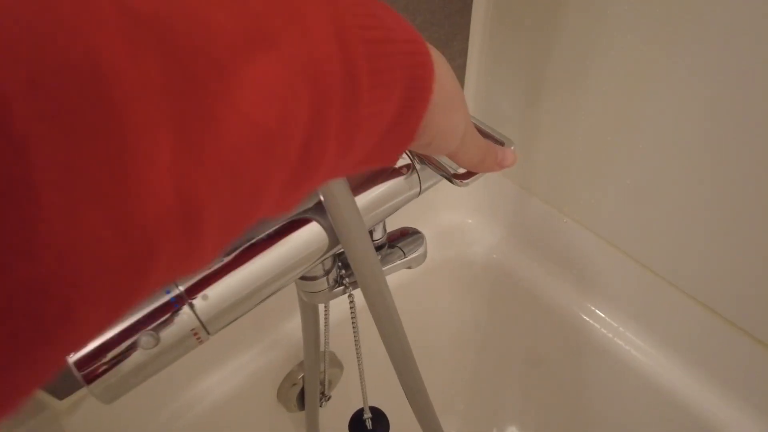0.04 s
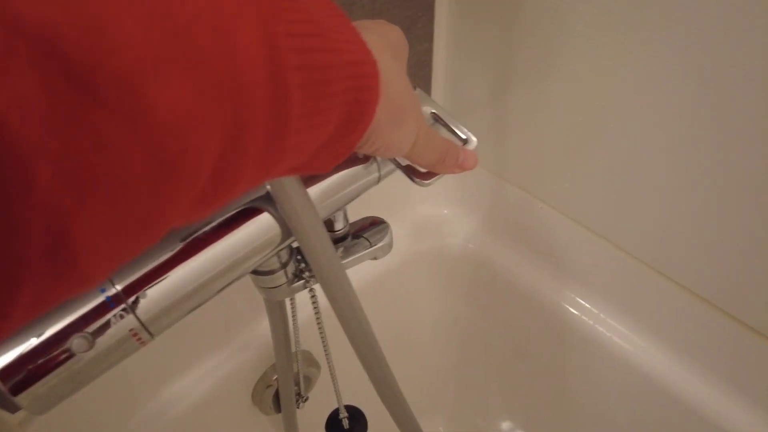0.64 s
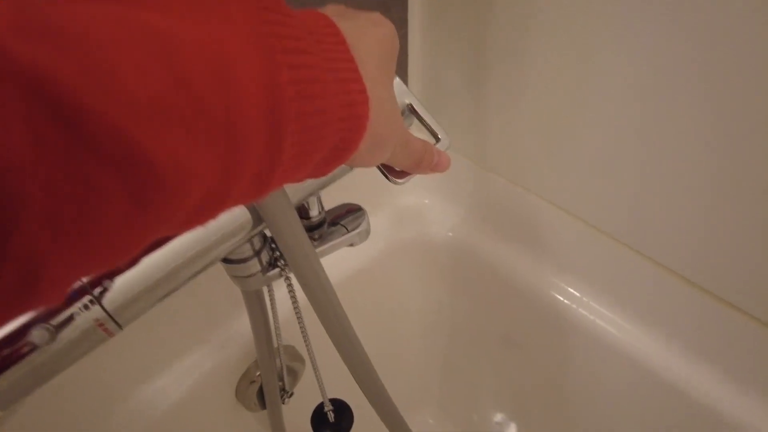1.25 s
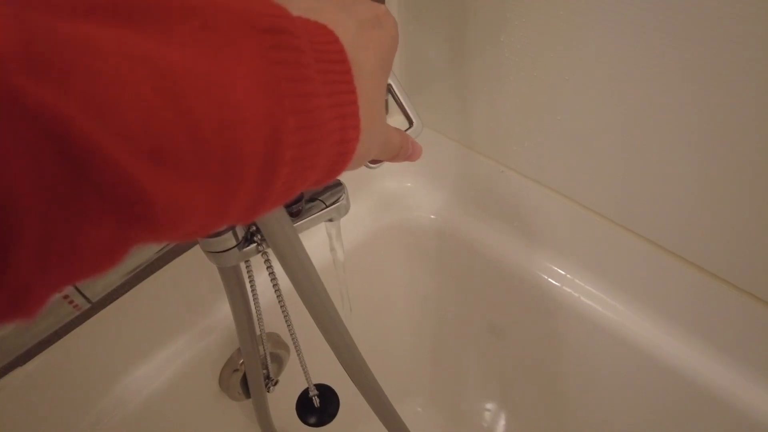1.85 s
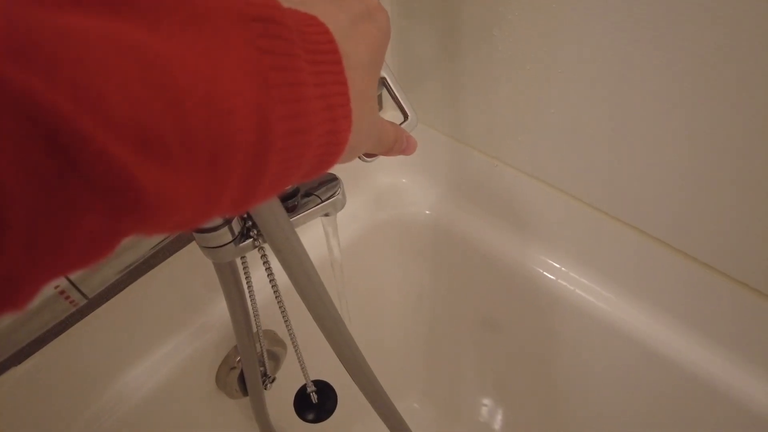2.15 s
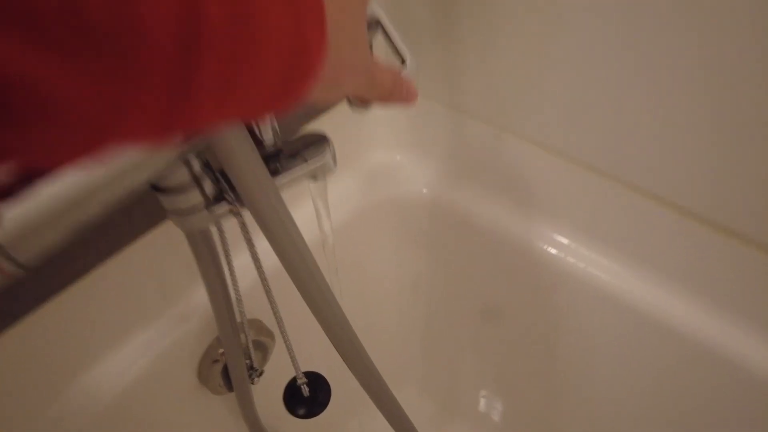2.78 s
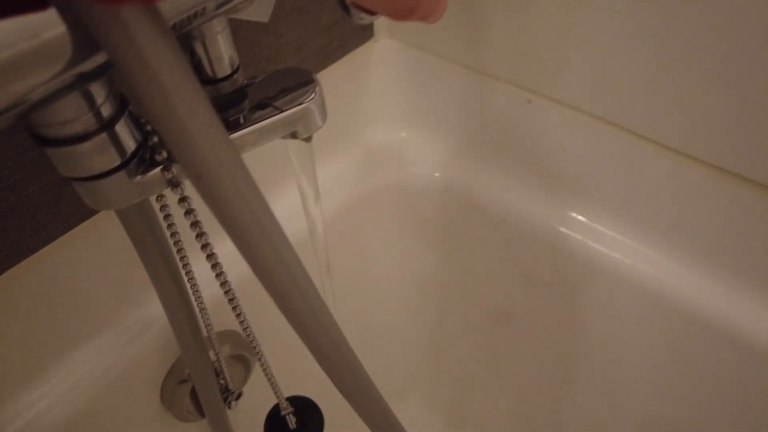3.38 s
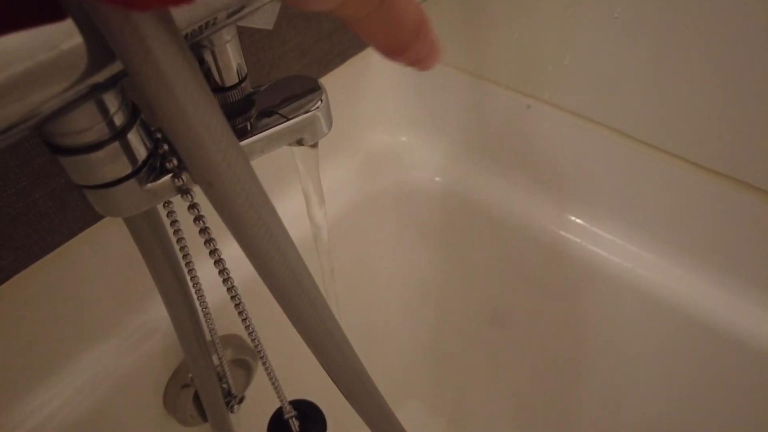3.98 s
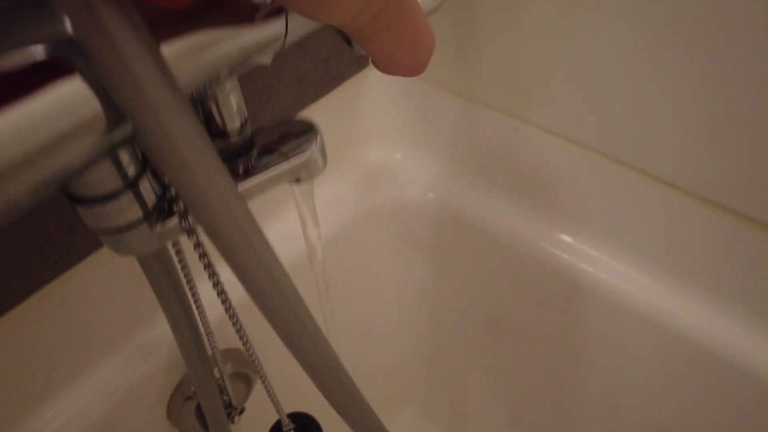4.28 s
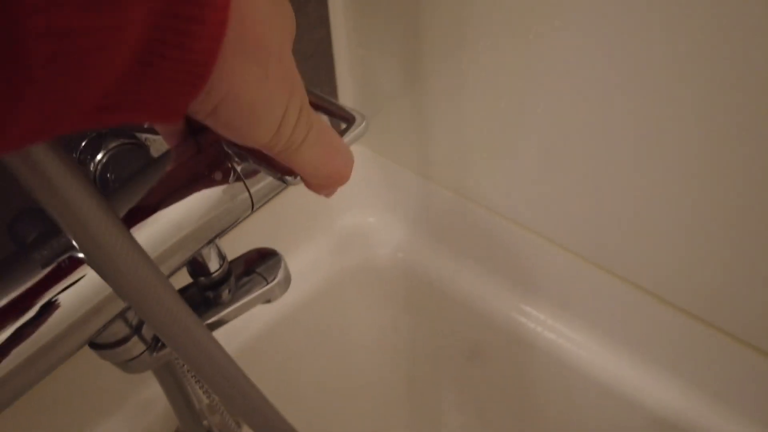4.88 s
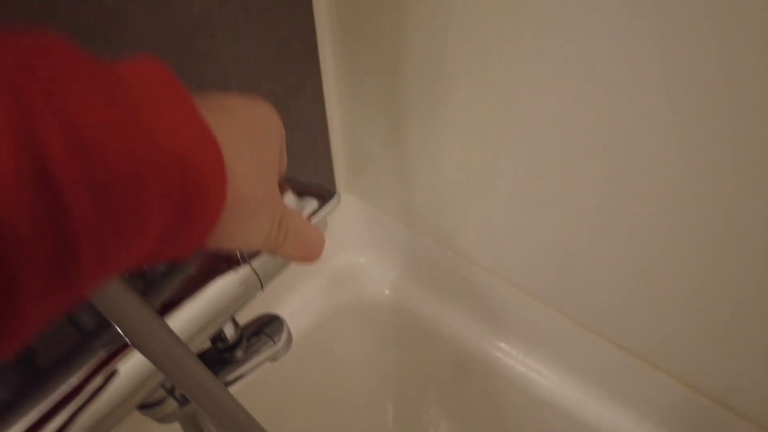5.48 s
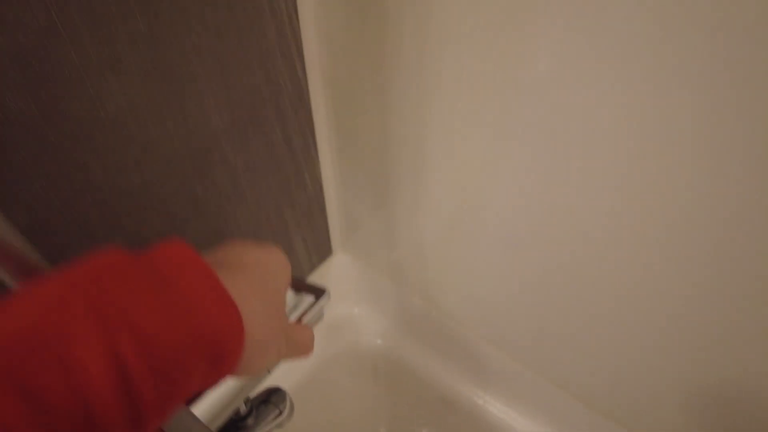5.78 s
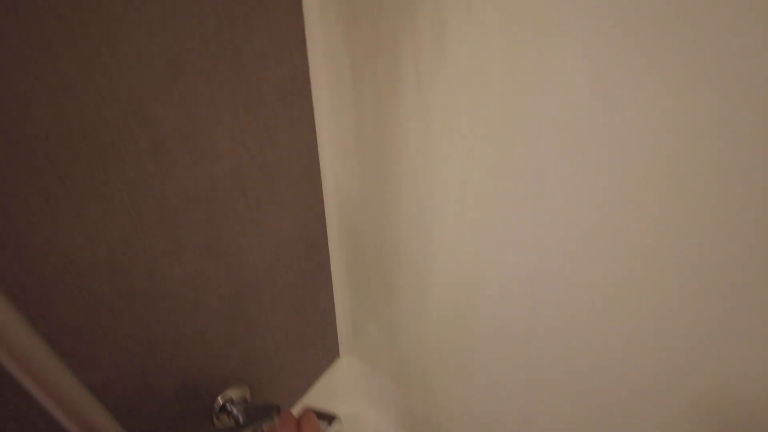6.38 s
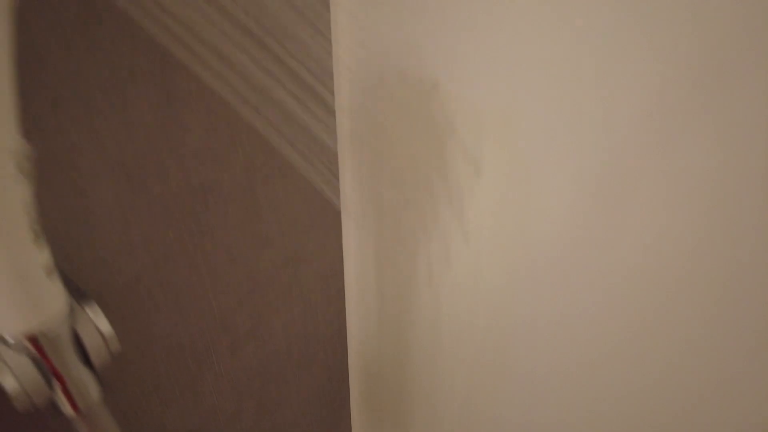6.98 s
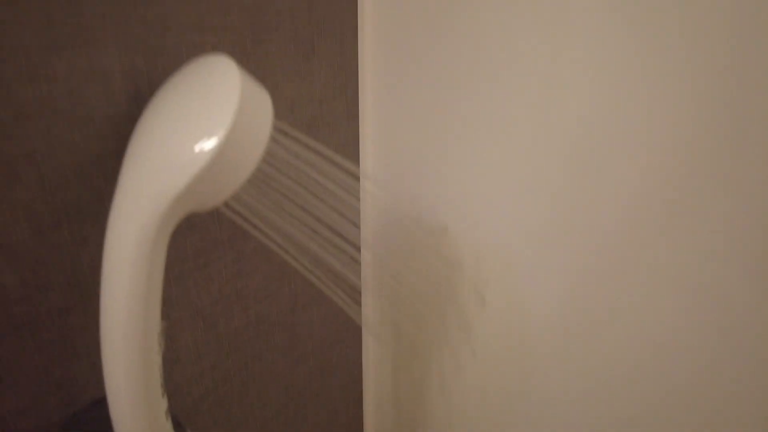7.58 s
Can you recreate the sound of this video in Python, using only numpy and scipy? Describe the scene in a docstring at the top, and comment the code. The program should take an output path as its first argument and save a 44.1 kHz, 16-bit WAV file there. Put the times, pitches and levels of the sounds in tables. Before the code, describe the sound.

A bath tap clicks on, water splashes and trickles into the tub, then it clicks over to a spraying shower while a fan hums.

```python
"""An extractor fan hums in a small plastic-walled bathroom. A bath mixer's lever clicks, ringing its
metal body; the valve hisses, the first water slaps the tub, and a thin stream drums and drips on it.
The lever rubs and clicks shut, then clicks over to the shower. Air rushes down the shuddering hose and
gurgles out of the hollow head; then fine jets sizzle on the wall panel and make it drum."""
import sys
import numpy as np
from scipy import signal
from scipy.fft import rfft, irfft
from scipy.io import wavfile

SR = 44100
rng = np.random.default_rng(int(sys.argv[2]) if len(sys.argv) > 2 else 0)


def digitize_waveform(pressure):
    """Quantize a signal to 16-bit integers and store it at the path in sys.argv[1].

    Rows of a 2-D input are taken as channels; values are limited to [-1, 1].
    """
    field = np.atleast_2d(pressure).T
    bounded = np.clip(field, -1, 1)
    quanta = np.round(bounded * 32767).astype(np.int16)
    wavfile.write(sys.argv[1], SR, quanta)


N = 341334
TIME = np.arange(N) / SR
SPOUT_ON_S, SPOUT_OFF_S, SHOWER_FULL_S = 1.8, 4.44, 6.2

# tub resonances: f/Hz, width/Hz, gain/dB
TUB_MODES = [(98, 10.5, -0.5), (130, 17, -6), (161.2, 8.8, -2.5), (213.7, 12, -1.5), (232, 41, -11.5),
             (267.7, 7.33, -7), (304.4, 15, -14.5), (484, 17, -17), (641.5, 22, -19.5), (760, 27, -24)]
# empty shower head's resonances: f/Hz, width/Hz, gain/dB
HEAD_MODES = [(770, 250, -6.5), (1377, 195, -.5), (1660, 210, -1), (3240, 1000, -9)]


def from_db(db):
    """Decibels to gain."""
    return 10 ** (np.asarray(db) / 20)


def unit_rms(x):
    """Scale to rms 1."""
    return x / np.sqrt(np.mean(x ** 2) + 1e-20)


def unit_hit(x):
    """Scale to the energy of 4 ms at rms 1."""
    return x * np.sqrt(.004 * SR / np.sum(x ** 2))


def add(track, t_s, sound):
    """Mix a sound into a track at t_s."""
    at = round(t_s * SR)
    track[at:at + len(sound)] += sound[:N - at]


def drift(rate_hz):
    """Slow random wander between knots of spread 1."""
    knots = rng.standard_normal(4000)
    return np.interp(TIME * rate_hz, np.arange(len(knots)), knots)


def swell(start_s, end_s, db, rise_s, fall_s):
    """Gain held from start to end; flanks of 20 dB per rise or fall time."""
    early_s, late_s = np.maximum(start_s - TIME, 0), np.maximum(TIME - end_s, 0)
    return from_db(db - 20 * (early_s / rise_s + late_s / fall_s))


def power_sum(gains):
    """Unrelated swells add in power."""
    return np.sqrt(np.sum(np.square(gains), axis=0))


def colour(x, spectrum):
    """Minimum-phase filter through (f/Hz, gain/dB) points."""
    size = 8192
    half = size // 2
    hz, db = np.transpose(spectrum)
    grid_hz = np.maximum(np.arange(half + 1) * SR / size, 1)
    gain = from_db(np.interp(np.log(grid_hz), np.log(hz), db))
    cepstrum = irfft(np.log(gain))
    cepstrum[1:half] *= 2
    response = irfft(np.exp(rfft(cepstrum[:half], size)))[:half]
    return signal.oaconvolve(x, np.array(response, ndmin=x.ndim), axes=-1)[..., :x.shape[-1]]


def resonate(x, modes):
    """Parallel resonances of alternating sign."""
    out = 0
    for k, (hz, width_hz, db) in enumerate(modes):
        radius = np.exp(-np.pi * width_hz / SR)
        poles = [1, -2 * radius * np.cos(2 * np.pi * hz / SR), radius * radius]
        gain = (-1) ** k * from_db(db) * (1 - radius * radius) / 2
        out = out + gain * signal.lfilter([1, 0, -1], poles, x + 1e-18)
    return out


def cavity(x, modes):
    """Sound passes twice, in and out, so the skirts are steep."""
    return resonate(resonate(x, modes), modes)


def diffuse(pair):
    """Two unrelated signals to a stereo field, alike in the bass only; mid rms 1."""
    # stereo width: f/Hz, side gain/dB
    side_spectrum = [(60, -21.5), (110, -22), (200, -15), (380, -7), (700, 0.5), (1290, -2.5), (2380, -3),
                     (4400, 2), (15000, -0.5)]
    mid, side = unit_rms(pair[0]), colour(unit_rms(pair[1]), side_spectrum)
    return np.array([mid + side, mid - side])


def noise_pair():
    """Two unrelated white noises."""
    return rng.standard_normal((2, N))


def impacts(per_s, spread_db):
    """Two random impulse trains, most impulses small, a few large."""
    sizes = from_db(spread_db * np.minimum(rng.exponential(1, (2, N)), 4))
    signs = rng.choice([-1, 1], (2, N))
    return sizes * signs * (rng.random((2, N)) < per_s / SR)


def burst(length_s):
    """Decaying, pitchless cluster of tiny impacts."""
    t = TIME[:SR // 8]
    envelope = np.exp(-t / max(length_s, 1e-4))
    cluster = rng.standard_normal(len(t)) * envelope
    for _ in range(3):
        whitened = irfft(np.exp(1j * np.angle(rfft(cluster))), len(t))
        cluster = whitened * np.minimum(1, 10 * envelope)
    return cluster


def fan(air_db=-55.5, boom_db=-55, waver_db=0.4):
    """Air noise, the room resonances it stirs and the motor's tones."""
    # air noise: f/Hz, gain/dB
    air_spectrum = [(12, -25.5), (20, -4), (44, -1.5), (68, -9), (86, -23.5), (107, -13.5), (130, -37.5),
                    (204, -22), (234, -26), (388, -38.5), (558, -49), (607, -29.5), (1000, -33),
                    (2460, -43.5), (16000, -64)]
    # room resonances: f/Hz, width/Hz, gain/dB
    room_modes = [(99.8, 10.8, 6.5), (175, 12, 4), (205, 19, 3.5), (379.4, 47, -8), (469, 14, -8),
                  (523, 68, -13), (672, 24, -12.5), (1310, 96, -21)]
    # shaft and mains tones: f/Hz, level/dB
    motor_tones = [(14.6, -55.5), (33.9, -46), (100, -57.5), (200.1, -61), (300.2, -74.5)]
    air = from_db(air_db) * diffuse(colour(noise_pair(), air_spectrum))
    boom = from_db(boom_db) * diffuse(resonate(noise_pair(), room_modes))
    hum = np.zeros(N)
    for hz, db in motor_tones:
        amplitude = np.sqrt(2) * from_db(db + waver_db * drift(rate_hz=3.2))
        hum += amplitude * np.sin(2 * np.pi * (hz * TIME + rng.random()))
    return air + boom + hum * from_db([[-1.4], [1.3]])


def lever(ring_db=-1.5, stress_db=6, body_db=-17, thud_hz=57, thud_t60_s=0.37):
    """Each detent scrapes to its notch, snaps, rings the metal body and shakes the wall."""
    # detents: t/s, level/dB, contact/s, f struck hardest/Hz, knock/dB, wall thud/dB, scrape/dB
    detents = [(0.7228, -33.5, 0.0015, 5600, 7, -44, -62), (4.8164, -27.5, .0014, 2560, -9, -37, -54),
               (4.818, -28, 0.001, 6520, -9, -59.5, -56.5), (5.462, -35, 0.0027, 7500, 4, -52, -50)]
    # mixer's metal body: f/Hz, width/Hz, gain/dB
    metal_modes = [(1270, 220, -9), (1850, 260, -6), (2560, 520, -0.5), (3720, 140, -2), (4650, 300, -7),
                   (5300, 450, -6), (6040, 200, -3), (6520, 380, 0), (7400, 470, -6), (8480, 600, -3),
                   (9550, 600, -6), (10950, 600, -7), (12700, 910, -10.5), (15260, 540, -7)]
    # snap and scrape: f/Hz, gain/dB
    contact_spectrum = [(200, -14), (900, -11), (1600, -14), (2600, 0), (4500, 1), (6500, -1.5),
                        (10000, -5.5), (15000, -3.5)]
    knock_modes = [(750, 900, -5), (1280, 380, 0), (1900, 480, 0)]
    clicks, thuds = np.zeros(N), np.zeros(N)
    friction = unit_rms(colour(impacts(per_s=4000, spread_db=4.0)[0], contact_spectrum))
    t = TIME[:3 * SR]
    sway = (1 - np.exp(-t / 0.056)) ** 2 * from_db(-60 * t / thud_t60_s)
    thud = np.sin(2 * np.pi * thud_hz * t) * sway / sway.max()
    for t_s, db, contact_s, struck_hz, knock_db, thud_db, scrape_db in detents:
        modes = [(hz, width_hz, mode_db + stress_db * (abs(np.log(hz / struck_hz)) < .08))
                 for hz, width_hz, mode_db in metal_modes]
        ring = from_db(ring_db) * unit_hit(resonate(burst(contact_s), modes))
        knock = from_db(body_db + knock_db) * unit_hit(resonate(burst(0.0081), knock_modes))
        snap = unit_hit(colour(burst(contact_s), contact_spectrum))
        add(clicks, t_s, from_db(db) * (snap + ring + knock))
        clicks += swell(t_s, t_s, scrape_db, rise_s=.012, fall_s=contact_s) * friction
        add(thuds, t_s, from_db(thud_db) * thud)
    return clicks, thuds


def valve(steady_flow, open_db=-72, hiss_db=-2, whistle_db=-7):
    """The gap hisses and whistles, most while held part open."""
    # part-open spells: start/s, end/s, level/dB, rise/s, fall/s
    part_open = [(1.442, 1.8, -59.5, 0.034, .05), (1.832, 1.87, -46, .08, 0.21),
                 (2.296, 2.348, -59, .08, 0.24), (4.333, 4.409, -53.5, 0.29, 0.039)]
    # hiss: f/Hz, gain/dB
    hiss_spectrum = [(700, -29.5), (1300, 0), (2300, 0), (3700, -6.5), (4600, 3.5), (5400, -2.5), (8000, 1),
                     (11500, -3), (12600, 4.5), (16000, 2.5)]
    # gap whistle: f/Hz, width/Hz, gain/dB
    gap_modes = [(2900, 520, -1.5), (9330, 400, -6.5), (10600, 600, -7.5), (14550, 500, -9)]
    envelope = power_sum([from_db(open_db) * steady_flow] + [swell(*spell) for spell in part_open])
    hiss = from_db(hiss_db) * diffuse(colour(noise_pair(), hiss_spectrum))
    whistle = from_db(whistle_db) * diffuse(resonate(noise_pair(), gap_modes))
    return envelope * (hiss + whistle)


def droplets(per_s, spread_db, low_hz, high_hz, q, bands=12):
    """Flying drops land at random, each ticking in the band its size sets."""
    landings = impacts(per_s, spread_db)[0]
    band = rng.integers(0, bands, N)
    centres_hz = np.geomspace(low_hz, high_hz, bands)
    ticks = sum(resonate(landings * (band == k), [(hz, hz / q, 0)]) for k, hz in enumerate(centres_hz))
    return unit_rms(ticks)


def spout(drum_db=-49.5, splash_db=-73.5, spatter_db=-80, splash_exponent=1.63):
    """The stream from the valve breaks into drops that drum on the tub, splash and spatter."""
    # gushes at onset and collapse: start/s, end/s, level/dB re steady flow, rise/s, fall/s
    gushes = [(1.815, 2.278, 3.5, 0.1, 0.26), (4.684, 4.86, 3, .08, 0.16)]
    # splash: f/Hz, gain/dB
    splash_spectrum = [(300, -2), (650, 7.5), (900, 5.5), (1300, 21), (2500, 13.5), (4500, 8.5),
                       (8000, -33.5), (15000, -15)]
    steady_flow = swell(SPOUT_ON_S, SPOUT_OFF_S, db=0, rise_s=0.097, fall_s=.4)
    flow = power_sum([steady_flow] + [swell(*gush) for gush in gushes])
    hiss = valve(steady_flow)
    drum = from_db(drum_db) * diffuse(resonate(impacts(per_s=300, spread_db=2.0), TUB_MODES))
    splash = from_db(splash_db) * unit_rms(colour(impacts(per_s=260, spread_db=0.5)[0], splash_spectrum))
    spatter = from_db(spatter_db) * droplets(per_s=170, spread_db=4.3, low_hz=4500, high_hz=14500, q=5)
    return flow ** splash_exponent * (splash + spatter), hiss + flow * drum


def bubble(hz, cycles=25, rise=0.031):
    """An air pocket rings down 60 dB over the given cycles, its pitch rising as it surfaces."""
    age = TIME[:SR // 8] * hz / cycles
    phase = 2 * np.pi * np.cumsum(hz * (1 + rise * np.minimum(age, 1))) / SR
    return unit_hit(np.sin(phase) * from_db(-60 * age))


def drips(gain_db=-8, small_per_s=22, low_hz=2960, high_hz=9970, rebound_db=-10, rebound_s=.025):
    """Each drop: impact tick, bubble plink, two rebounds. Small drops fall between the big ones."""
    # big drops from spout, then shower head: t/s, relative level/dB, bubble f/Hz, tick/dB re bubble
    big_drops = [(2.4652, -54, 10600, -2), (2.5154, -62, 4040, 0), (2.5916, -43.5, 4450, -8),
                 (2.6696, -52.5, 6050, -7), (2.7311, -57, 4860, -2), (2.778, -51.5, 5230, -6),
                 (2.8418, -57, 5700, -5), (2.8858, -50, 8900, -4), (2.9879, -45, 3520, -8),
                 (2.998, -59, 11500, -1), (3.0489, -56, 9130, -6), (3.0833, -59, 4680, 2),
                 (3.138, -55, 10000, -1), (3.196, -57.5, 3200, 1), (3.283, -49, 14600, 0),
                 (3.318, -60, 10500, -5), (3.423, -50, 2830, -10), (3.438, -56, 8300, -4),
                 (3.5115, -51, 2850, -8), (3.5861, -57, 4100, 2), (3.9553, -59, 9400, -3),
                 (3.975, -39.5, 2620, -20), (4.0997, -50, 2330, -5), (4.1332, -43.5, 8670, -8),
                 (4.2067, -42.5, 6080, -8), (4.2793, -54, 3090, -5), (4.358, -45.5, 6150, -8),
                 (4.3948, -44, 13400, -10), (4.4845, -58, 4170, 0), (5.577, -52, 7000, 0),
                 (5.594, -48, 4200, -4), (5.606, -49, 9000, 2), (5.635, -48, 10000, 3),
                 (5.706, -46, 14000, -7), (5.862, -51, 7400, -5), (5.875, -48, 6700, -7),
                 (5.975, -46, 9000, 0)]
    # impact tick: f/Hz, gain/dB
    tick_spectrum = [(500, -13.5), (2000, -4), (5000, -4.5), (9000, -0.5), (15000, 0.5)]
    small_drops = []
    for k, (jitter, size, pitch) in enumerate(rng.random((150, 3))):
        t_s = SPOUT_ON_S + (k + jitter) / small_per_s
        if t_s < SPOUT_OFF_S:
            small_drops.append((t_s, -63 + 4.5 * (2 * size - 1), low_hz * (high_hz / low_hz) ** pitch, -2))
    out = np.zeros(N)
    tick = unit_hit(colour(burst(0.00055), tick_spectrum))
    for t_s, db, hz, tick_db in big_drops + small_drops:
        add(out, t_s, from_db(db) * (from_db(tick_db) * tick + bubble(hz)))
        for flight_s in rebound_s * rng.random(2):
            add(out, t_s + flight_s, from_db(db + tick_db + rebound_db) * tick)
    return from_db(gain_db) * out


def slaps(pocket_q=3.6, tub_db=-14):
    """A slug of water bursts into spray, squeezes an air pocket and knocks the tub's upper modes."""
    # slugs on tub and wall: t/s, level/dB, length/s, pocket f/Hz, pocket/dB re spray
    slugs = [(1.852, -31, 0.0046, 4300, 0.5), (1.926, -45.5, .002, 6100, 2),
             (1.933, -35.5, 0.003, 6300, -6), (1.943, -35, .009, 13500, -4),
             (1.9995, -32, 0.0044, 5100, -3), (2.071, -45, .003, 13000, -9), (2.079, -44, .005, 14000, -6),
             (2.092, -28.8, 0.005, 2850, 6.5), (2.1888, -36.5, 0.0025, 8200, -7.5),
             (2.2865, -50, .002, 11000, 0), (2.364, -48.5, .003, 14100, 4), (4.62, -57, .01, 7400, -1.5),
             (4.641, -55, .012, 13000, 1), (4.692, -49, .002, 7600, 10), (4.694, -52, .006, 13500, 11),
             (6.698, -31, 0.021, 2800, -9.5), (7.05, -33, 0.023, 2000, -8), (7.439, -44, .025, 1900, 5),
             (7.492, -35, 0.02, 3000, 3.5), (7.696, -35.5, .009, 4400, -4)]
    # bursting slug: f/Hz, gain/dB
    slap_spectrum = [(200, 4), (900, -5.5), (1500, -2.5), (5000, -2), (9000, -1), (15000, -4.5)]
    upper_modes = [mode for mode in TUB_MODES if mode[0] > 400]
    out = np.zeros(N)
    for t_s, db, length_s, hz, pocket_db in slugs:
        pocket = from_db(pocket_db) * unit_hit(cavity(burst(length_s), [(hz, hz / pocket_q, 0)]))
        knock = from_db(tub_db) * unit_hit(resonate(burst(length_s), upper_modes))
        spray = unit_hit(colour(burst(length_s), slap_spectrum))
        add(out, t_s, from_db(db) * (spray + pocket + knock))
    return out


def cartridge_rub():
    """The cartridge's discs stick and slip as they slide shut."""
    # cartridge resonances: f/Hz, width/Hz, gain/dB
    cartridge_modes = [(670, 130, 0), (950, 200, -7)]
    rubbing = diffuse(resonate(impacts(per_s=500, spread_db=2.0), cartridge_modes))
    return swell(4.69, 4.79, db=-59.5, rise_s=.08, fall_s=.05) * rubbing


def hose():
    """Air rushes down the empty hose; its wall shudders as the water arrives."""
    # hose wall: f/Hz, width/Hz, gain/dB
    hose_modes = [(102, 11.5, 1.5), (250, 110, -14), (430, 70, -11)]
    # air column: f/Hz, width/Hz, gain/dB
    bore_modes = [(370, 110, -3), (490, 130, -1), (700, 170, 0), (1450, 400, -7)]
    shudder = diffuse(resonate(impacts(per_s=900, spread_db=1.5), hose_modes))
    air = diffuse(resonate(noise_pair(), bore_modes))
    return (swell(5.49, 5.6, db=-57, rise_s=.05, fall_s=.28) * air
            + swell(5.57, 5.72, db=-48, rise_s=.06, fall_s=.13) * shudder)


def gurgles():
    """Air driven from the hose rings the hollow head, each surge at its own pitch."""
    # air surges: t/s, level/dB, length/s, pitch ratio to empty head
    surges = [(5.571, -44.5, 0.006, 1.03), (5.607, -44.5, 0.006, 0.83), (5.62, -41, 0.008, 0.97),
              (5.7775, -36.5, 0.0028, 1.01), (5.94, -52, 0.0088, 1.05), (6.034, -34, .0025, .98),
              (6.115, -45, .008, 0.99), (6.181, -43, .01, 0.96)]
    out = np.zeros(N)
    for t_s, db, length_s, ratio in surges:
        modes = [(hz * ratio, width_hz, mode_db) for hz, width_hz, mode_db in HEAD_MODES]
        add(out, t_s, from_db(db) * unit_hit(cavity(burst(length_s), modes)))
    return out


def shower_pressure(dribble_db=-29, sag_db_per_s=0.4, waver_db=1):
    """A dribble, an airy spurt, then full pressure (about 1) that wavers and sags."""
    dribble = np.full(N, from_db(dribble_db))
    spurt = swell(6, 6, db=-18, rise_s=1.3, fall_s=0.15)
    sag_db = sag_db_per_s * np.maximum(TIME - SHOWER_FULL_S, 0)
    full = swell(SHOWER_FULL_S, np.inf, waver_db * drift(rate_hz=11) - sag_db, rise_s=.26, fall_s=1)
    return power_sum([dribble, spurt, full])


def shower_head(pressure, ring_db=-46.5, fade_db_per_s=3, echo_db=-5):
    """Flow rings the head: lower as it fills, fainter as the last air leaves."""
    # filling head: t/s, pitch ratio to empty head
    pitch_curve = [(5.5, 0.94), (5.9, 0.97), (6.2, 0.93), (6.8, 0.88), (7.3, .845), (7.74, 0.86)]
    ringing = cavity(impacts(per_s=2500, spread_db=3.5), HEAD_MODES)
    position = np.cumsum(np.interp(TIME, *np.transpose(pitch_curve)))
    direct, echo = [unit_rms(np.interp(position % N, np.arange(N), part)) for part in ringing]
    fade_db = fade_db_per_s * np.maximum(TIME - SHOWER_FULL_S, 0)
    envelope = from_db(ring_db - fade_db) * np.sqrt(pressure)
    return envelope * (direct + from_db(echo_db) * echo * [[.5], [-.5]])


def shower(on_s=5.58, sizzle_db=-36, patter_db=-45.5, wall_db=-44.3, wall_exponent=0.57):
    """Hose and head feed fine jets that sizzle and drum on the wall panel; larger drops patter."""
    # jet sizzle: f/Hz, gain/dB
    spray_spectrum = [(300, -7), (600, -3.5), (950, -4.5), (1850, -2), (2900, -0.5), (3700, -3),
                      (4900, -2.5), (6200, 0), (9400, 2), (11400, 0), (13200, 5.5), (16000, 4)]
    # wall panel: f/Hz, width/Hz, gain/dB
    panel_modes = [(102.8, 5, -1.5), (132, 12, -12), (168.3, 23, -2.5), (194.7, 16, -1), (250, 87, -6.5),
                   (305, 50, -4.5), (349, 21.6, -9.5), (472, 65, -15), (541, 39, -13), (681, 20, -17)]
    opened = swell(on_s, np.inf, db=0, rise_s=0.07, fall_s=1)
    pressure = shower_pressure()
    jets = diffuse(colour(impacts(per_s=16000, spread_db=1.5), spray_spectrum))
    large_drops = droplets(per_s=600, spread_db=4.4, low_hz=2200, high_hz=13000, q=3)
    panel = diffuse(resonate(impacts(per_s=900, spread_db=1.8), panel_modes))
    sizzle = from_db(sizzle_db) * pressure * jets
    patter = from_db(patter_db) * pressure * large_drops
    drum = from_db(wall_db) * pressure ** wall_exponent * panel
    return opened * patter, hose() + opened * (sizzle + drum + shower_head(pressure))


def bathroom(x, t60_s=.17, tail_db=1.3, ceiling_s=.0125, ceiling_db=-10, build_s=0.0017):
    """Direct sound, a scattered ceiling echo and a short dense tail."""
    t = TIME[:SR // 3]
    tail = from_db(-60 * t / t60_s) * (1 - np.exp(-t / build_s))
    echo = np.exp(-((t - ceiling_s) / build_s) ** 2)
    envelope = from_db(tail_db) * unit_rms(tail) + from_db(ceiling_db) * unit_rms(echo)
    response = diffuse(rng.standard_normal((2, len(t)))) * envelope / np.sqrt(len(t))
    response[:, 0] += 1
    return signal.oaconvolve(x[None], response, axes=-1)[:, :N]


def scene():
    """Sharp sounds echo in the room; steady ones are already diffuse."""
    clicks, thuds = lever()
    splash, running = spout()
    patter, spraying = shower()
    sharp = clicks + slaps() + drips() + gurgles() + splash + patter
    echoing = bathroom(sharp) * from_db([[-.5], [-1.5]])
    return echoing + thuds + cartridge_rub() + running + spraying + fan()


def record(dry):
    """Steep elliptic low-pass."""
    cutoff_hz = 15750
    return signal.sosfilt(signal.ellip(12, .1, 80, cutoff_hz, fs=SR, output="sos"), dry)


dry = scene()
out = record(dry)
digitize_waveform(out)
```